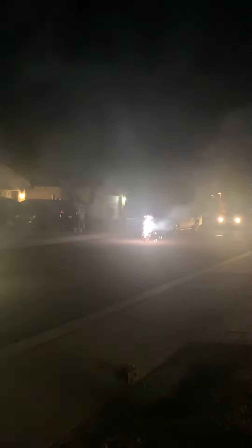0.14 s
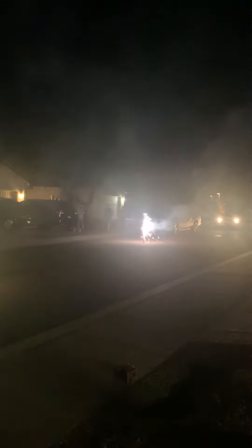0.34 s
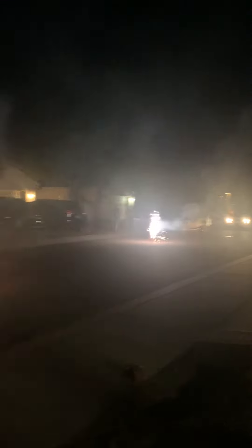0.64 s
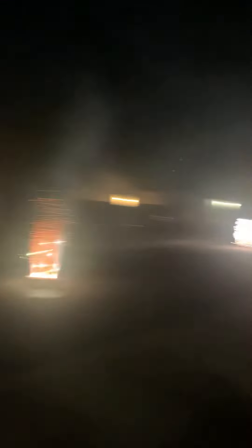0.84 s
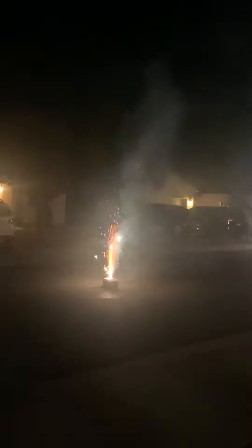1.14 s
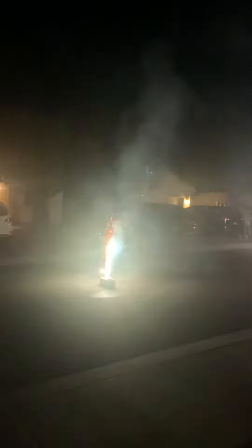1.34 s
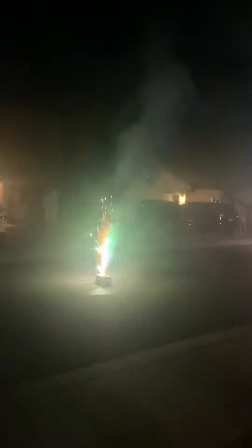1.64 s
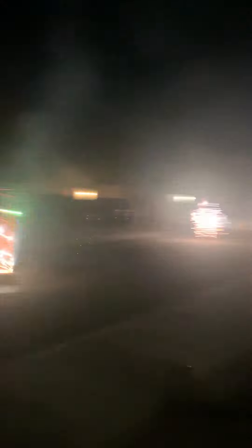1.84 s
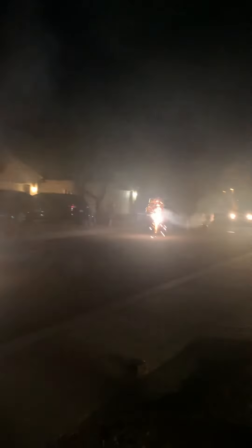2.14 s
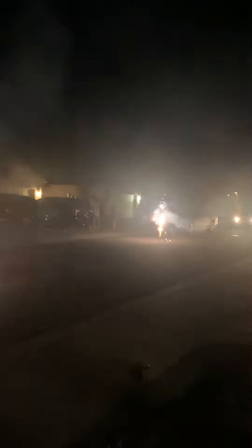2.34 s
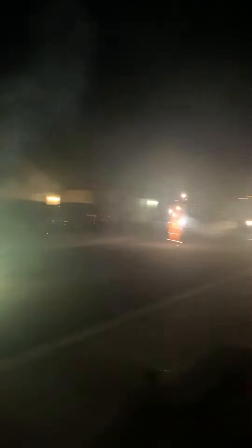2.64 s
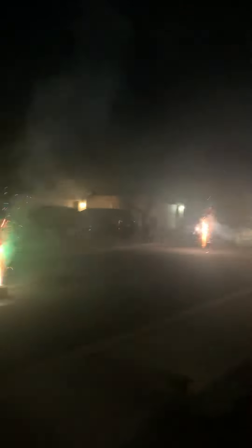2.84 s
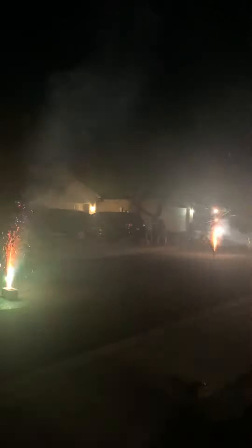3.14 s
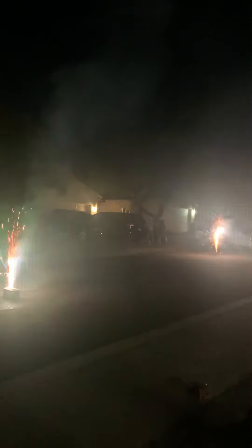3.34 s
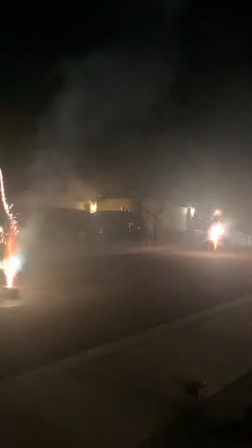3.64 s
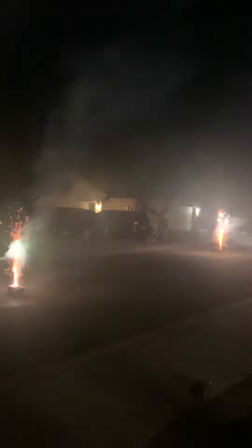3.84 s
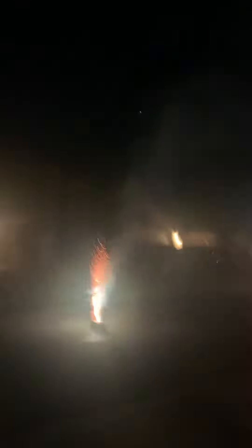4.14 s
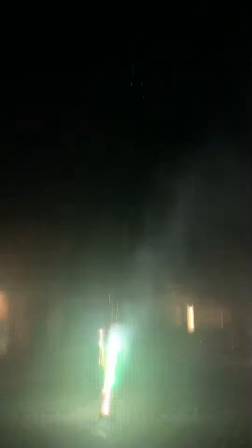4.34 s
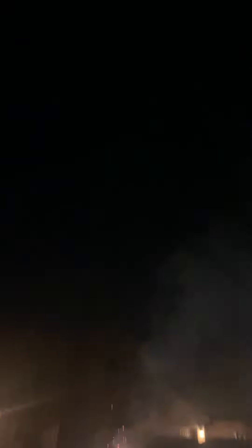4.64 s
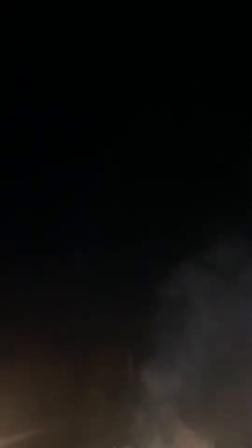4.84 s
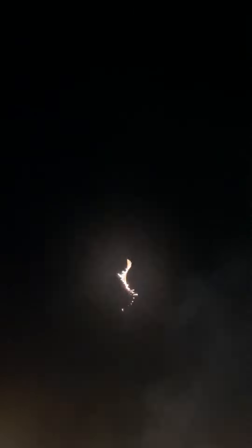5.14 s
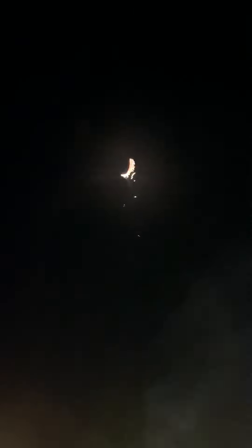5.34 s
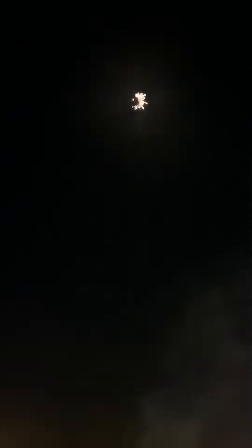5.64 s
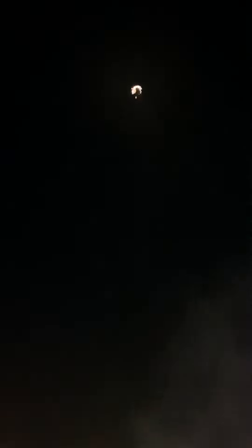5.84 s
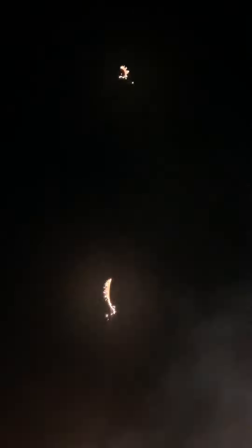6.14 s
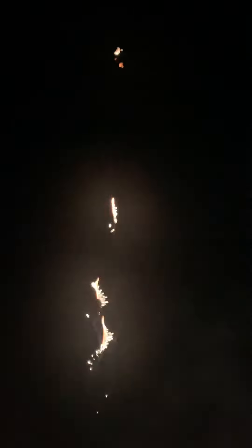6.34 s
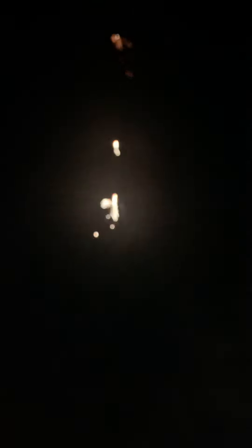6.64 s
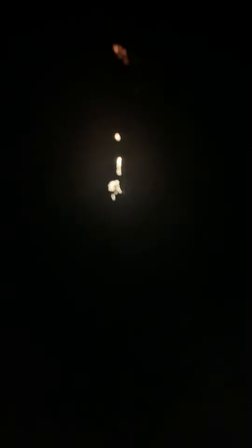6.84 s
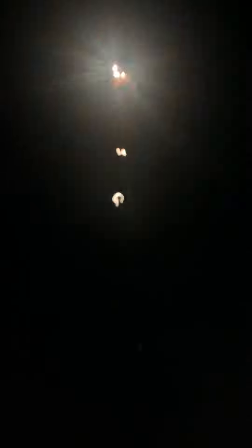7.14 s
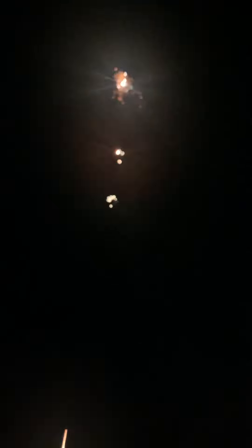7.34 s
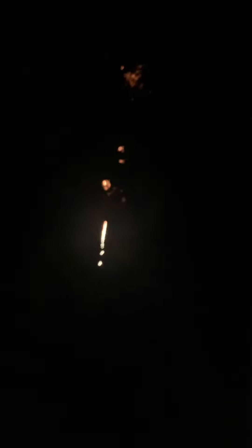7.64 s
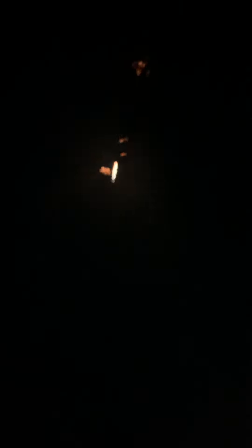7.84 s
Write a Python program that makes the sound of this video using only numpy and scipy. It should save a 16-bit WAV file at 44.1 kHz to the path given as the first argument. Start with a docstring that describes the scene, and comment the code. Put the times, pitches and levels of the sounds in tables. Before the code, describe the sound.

Ground fireworks hiss and crackle densely on a street, then fire six shrill, falling whistles, each launched with a sharp thumping pop.

```python
"""Fireworks on a street at night, heard from the kerb through two microphone ports.
Distant shots thud over the town's rumble and the hiss and roar of fountain jets. From 1.2 s sparks
crackle; from 2.1 s lift charges thump in their tubes. From 3.5 s six of them launch whistles, which
tumble and fall in pitch as their fuel burns. From 4.3 s the ground sounds turn hollower: more 1 kHz,
less 2.5 kHz. Asphalt and house fronts reflect throughout."""
import sys
import numpy as np
from scipy import signal
from scipy.fft import rfft, irfft, next_fast_len
from scipy.io import wavfile
from scipy.ndimage import uniform_filter1d

SR = 44100
rng = np.random.default_rng(int(sys.argv[2]) if len(sys.argv) > 2 else 0)


def output_pcm(signal):
    """Save a mono or channel-first signal as 16-bit PCM at the path in sys.argv[1].

    Samples are clipped to [-1, 1] before scaling.
    """
    pcm = np.clip(np.atleast_2d(signal).T, -1, 1) * 32767
    wavfile.write(sys.argv[1], SR, np.round(pcm).astype(np.int16))


N = 352359
TIME_S = np.arange(N) / SR

# Table levels are relative. loudest sparks, plus the second snap of the lift at 3.542 s (row at 3.556 s): (time
# [s], level [dB], treble [dB])
LOUD_SPARKS = [(1.2481, -17.5, 3), (1.3047, -31, 17), (1.339, -21.5, 4), (1.3499, -14, 1),
               (1.3772, -16.5, 4), (1.4057, -28.5, 4), (1.4329, -32, 6), (1.4585, -33, -9),
               (1.4942, -32, 7), (1.5191, -15.5, 0.5), (1.5755, -28.5, 10), (1.6093, -10.5, 3),
               (1.6245, -52, -7), (1.6661, -26, 7), (1.7062, -12, 4), (1.727, -12.5, 20), (1.734, -11.5, 1),
               (1.7414, -16, 4), (1.7629, -12, 12), (1.7876, -10.5, 0.5), (1.8148, -15, 3),
               (1.8199, -15, -12), (1.8347, -11.5, 1), (1.8529, -9.5, 6), (1.8719, -10.5, -1),
               (1.892, -12, 3), (1.9016, -13, -5), (1.9106, -9.5, 3), (1.9193, -8.5, 3),
               (1.9349, -11.5, -1), (1.9434, -13, 4), (1.9788, -13, 6), (1.9853, -14, 17), (1.9956, -11, 3),
               (2.0033, -13.5, -4), (2.0145, -13.5, -7), (2.0215, -8, 14), (2.0318, -13, -14),
               (2.0433, -10.5, -1), (2.0763, -8.5, 13), (2.0932, -15.5, -11), (2.1093, -10.5, 1),
               (2.1351, -13, -3), (2.1694, -40, 11), (2.1859, -8.5, -1), (2.2003, -11, -1),
               (2.2096, -18, -8), (2.222, -14, 17), (2.2299, -22, 8), (2.2516, -21, -3), (2.2611, -25, -1),
               (2.2695, -9.5, 4), (2.2779, -15, -5), (2.2851, -10, 1), (2.3016, -8, -1), (2.3128, -30, -3),
               (2.3274, -8, -1), (2.3529, -20, 9), (2.3583, -13, 9), (2.3784, -18, 3), (2.3925, -17, 9),
               (2.4367, -13, -11), (2.452, -11, 2), (2.4587, -15, -15), (2.4975, -10.5, 0),
               (2.5084, -10.5, 6), (2.5274, -13, 6), (2.5583, -9.5, 5.5), (2.5766, -13, 5),
               (2.5949, -9, -1), (2.6242, -9, -2), (2.638, -21, -1), (2.6436, -16, 4), (2.655, -14.5, -5),
               (2.6675, -11, 6), (2.6695, -11, -4), (2.673, -7.5, 1), (2.6755, -17, -4), (2.709, -19.5, 7),
               (2.7382, -15.5, -2), (2.7498, -17, 1), (2.7822, -12.5, 3), (2.8055, -25, 14),
               (2.8096, -26, 9), (2.8241, -15.5, -1), (2.84, -24, 15), (2.8572, -14.5, 2),
               (2.864, -14.5, -2), (2.8935, -22, 4), (2.9048, -12.5, 4), (2.9114, -20, 1), (2.938, -21, 5),
               (2.9412, -11, 1), (2.945, -9, -7), (2.9797, -17, 6), (2.991, -16.5, 5), (3.0188, -24, 2),
               (3.0271, -9.5, 4), (3.0482, -15, 4), (3.066, -8.5, 0.5), (3.0928, -15, -1),
               (3.1355, -16.5, 2), (3.146, -19, 4), (3.1576, -19.5, -13), (3.1716, -16, 2),
               (3.1834, -15, 0), (3.1896, -21, 4), (3.196, -31, -5), (3.2124, -19, 3), (3.2167, -19, -5),
               (3.2369, -15, 7), (3.2451, -14, 0), (3.262, -10, -3), (3.2683, -17, -5), (3.2861, -17, 4),
               (3.3057, -16, 4), (3.3436, -13, 0.5), (3.369, -18.5, 2), (3.4021, -15.5, -1),
               (3.4226, -13, 3), (3.4388, -35, -1), (3.4501, -12.5, 0), (3.4539, -19, -5),
               (3.4604, -16, -1), (3.4697, -17, 1), (3.5217, -17, 11), (3.533, -14.5, 1.5),
               (3.556, -12, 14), (3.6248, -19, -1), (3.6495, -21, 6), (3.664, -24, 0), (3.8732, -27, -4),
               (3.9052, -24, 0), (3.9593, -24, 3), (3.9936, -23, 2), (4.0544, -22, 3), (4.1614, -25, 6),
               (4.178, -16.5, 0), (4.2203, -23, -2), (4.2479, -20, 5), (4.2552, -19.5, -1),
               (4.2683, -20, 4), (4.3091, -24, 3), (4.32, -18.5, -5), (4.3557, -15, 2.5), (4.3732, -23, 2),
               (4.4068, -17.5, -4), (4.4535, -20.5, 0), (4.5034, -16.5, -2), (4.5693, -21, 5),
               (4.5785, -22, -4), (4.604, -20.5, 0), (4.6274, -21.5, 1), (4.6875, -20.5, -4),
               (4.7337, -21.5, 10), (4.798, -19.5, 0), (4.8134, -25, 11), (4.8275, -16, -2),
               (4.8398, -21, 10), (4.846, -19, -1), (4.8702, -17, 3), (4.9452, -19.5, 0), (4.9498, -22, -6),
               (4.9549, -26, 1), (4.9804, -23, 6), (5.0313, -24, 4), (5.0562, -21, 5), (5.1921, -35, -8),
               (5.2691, -19, -3), (5.3078, -21, -5), (5.3487, -27.5, 8), (5.388, -29, 11),
               (5.4063, -24, 15), (5.4111, -18.5, 1), (5.4164, -18, 15), (5.4496, -27, 12),
               (5.4609, -18, 0), (5.5105, -21, 4), (5.5436, -21.5, -2), (5.5571, -23, -1), (5.5798, -28, 0),
               (5.585, -21, 0), (5.5905, -23, 11), (5.6464, -24, -11), (5.6526, -35, -13),
               (5.7019, -20.5, 13), (5.716, -23.5, -2), (5.7496, -28, 10), (5.7589, -21.5, 12),
               (5.7862, -20.5, 1), (5.8293, -22, 2), (6.2781, -33, -4), (6.3157, -28.5, -5),
               (7.2591, -32.5, -2), (7.362, -37, 2)]
# shower of small sparks: (time [s], level [dB], treble [dB], rate [1/s])
SPARK_SHOWER = [(1.2, -56, 4, 40), (1.35, -46, 5, 60), (1.69, -45, 5, 60), (1.78, -32, 0, 260),
                (2.2, -28, 0, 290), (2.65, -30, -2, 260), (2.8, -35, 0, 240), (3.2, -33, -1, 240),
                (3.7, -36.5, 1, 170), (4.4, -39.5, -1, 150), (4.85, -39, -2, 150), (5.5, -36, -1, 160),
                (5.8, -37, 0, 150), (6.2, -42, -6, 100), (6.7, -64, -4, 20)]
# spark or snap: (frequency [Hz], level [dB])
CRACK_SPECTRUM = [(40, -30.5), (110, -9), (280, -2.5), (420, -9), (580, -13.5), (850, 4.5), (1150, -3.5),
                  (1350, -0.5), (1560, 5.5), (1800, -2), (2150, -2), (2750, 1.5), (3200, -3.5),
                  (4800, -2.5), (6100, 0.5), (9000, -5.5), (13500, -8.5), (15500, -13.5)]

# one flight per whistle: (time [s], pitch [Hz], level [dB])
WHISTLE_FLIGHTS = [
    [(3.555, 5055, -14.5), (3.579, 4850, -17.0), (3.619, 4775, -21.5), (3.651, 4550, -18.0),
     (3.683, 4550, -16.0), (3.707, 4390, -18.0), (3.755, 4345, -22.5), (3.795, 4165, -21.5),
     (3.875, 4045, -23.0), (3.891, 3990, -28.5), (4.019, 3775, -28.5), (4.043, 3780, -40.0),
     (4.099, 3685, -25.0), (4.203, 3570, -27.5), (4.299, 3515, -42.0), (4.451, 3390, -27.5),
     (4.611, 3290, -33.5), (4.739, 3240, -34.0), (4.811, 3205, -40.0), (4.827, 3175, -35.0),
     (4.979, 3110, -41.5), (5.131, 3215, -39.5), (5.243, 3200, -43.0), (5.275, 3280, -50.0)],
    [(4.889, 5415, -14.0), (4.897, 5405, -13.5), (4.921, 5005, -18.5), (4.969, 5060, -18.0),
     (4.993, 4875, -18.5), (5.025, 4900, -25.0), (5.057, 4670, -15.0), (5.089, 4655, -23.0),
     (5.121, 4520, -20.5), (5.145, 4540, -22.5), (5.177, 4345, -22.5), (5.225, 4350, -17.5),
     (5.241, 4250, -27.0), (5.297, 4205, -20.5), (5.313, 4160, -33.0), (5.361, 4110, -22.0),
     (5.425, 4030, -31.0), (5.505, 3960, -28.0), (5.545, 3915, -32.0), (5.561, 3885, -24.0),
     (5.785, 3690, -37.0), (5.865, 3620, -28.5), (5.969, 3570, -34.0), (6.057, 3485, -29.0),
     (6.305, 3425, -41.0), (6.353, 3465, -37.0), (6.449, 3600, -47.5), (6.465, 3745, -40.0)],
    [(5.86, 5045, -14.0), (5.884, 4935, -20.0), (5.916, 5105, -19.0), (5.932, 4845, -16.0),
     (5.996, 4610, -23.0), (6.108, 4305, -23.5), (6.156, 4285, -25.0), (6.348, 3905, -29.0),
     (6.404, 3860, -42.0), (6.452, 3785, -36.5), (6.556, 3645, -39.5), (6.604, 3590, -33.0),
     (6.716, 3465, -30.5), (6.908, 3330, -43.5), (7.148, 3175, -43.0), (7.164, 3185, -57.5),
     (7.22, 3120, -42.5), (7.388, 3075, -46.0), (7.548, 3250, -53.0)],
    [(6.022, 4995, -16.0), (6.062, 4870, -20.5), (6.094, 4980, -19.5), (6.134, 4640, -22.5),
     (6.446, 4025, -27.0), (6.478, 4065, -39.0), (6.51, 3990, -28.0), (6.694, 3840, -33.0),
     (6.718, 3815, -38.0), (6.862, 3605, -28.5), (7.222, 3295, -45.0), (7.246, 3370, -34.0),
     (7.254, 3270, -46.0), (7.326, 3230, -44.0), (7.406, 3260, -52.0), (7.414, 3365, -43.5)],
    [(6.078, 5545, -24.5), (6.15, 5125, -21.0), (6.174, 5145, -26.0), (6.182, 5020, -23.5),
     (6.246, 4840, -21.0), (6.278, 4810, -26.5), (6.406, 4330, -28.5), (6.454, 4285, -28.5),
     (6.542, 4035, -27.5), (6.726, 3825, -35.5), (6.862, 3670, -30.0), (7.15, 3510, -30.0),
     (7.166, 3485, -39.5), (7.246, 3435, -31.5), (7.326, 3415, -38.0), (7.542, 3495, -38.5),
     (7.598, 3600, -46.0)],
    [(7.136, 4945, -24.5), (7.152, 4925, -21.0), (7.176, 4835, -21.0), (7.184, 4715, -21.5),
     (7.2, 4630, -20.5), (7.224, 4625, -22.5), (7.264, 4455, -21.0), (7.344, 4235, -21.0),
     (7.408, 4110, -29.0), (7.416, 4055, -30.5), (7.504, 3900, -27.0), (7.52, 3885, -37.0),
     (7.568, 3815, -27.5), (7.688, 3665, -26.5), (7.704, 3675, -37.5), (7.752, 3605, -30.0),
     (8.0, 3420, -37.0)],
]
# one voice per whistle: (trim [dB], screech [0-1], overtones [dB], overtone fade [dB/s],
# tumble rate [Hz], tumble depth [factor])
WHISTLE_VOICES = [(1.5, 0.46, 3.5, 11.5, 17, 0.35), (0.5, 0.4, 0.5, 2, 12, 1.8), (0, 0.8, 0.5, 9, 12, .6),
                  (-0.5, .9, 2, 8.5, 12, 1.2), (-0.5, 0.76, -1.5, 2.5, 12, 0.6),
                  (1, 0.26, 1.5, 16.5, 8.6, 0.1)]
# whistle tube: (harmonic [number], level [dB], tumble swing [dB], launch offset [dB])
WHISTLE_PARTIALS = [(1, 0.5, 1, 1.5), (2, -8, 1.5, -14), (3, -15, 9, -12.5), (4, -24.5, 9, -9)]
# whistle gas: (frequency [Hz], level [dB])
EXHAUST_SPECTRUM = [(400, -28), (900, -17), (1500, 3.5), (3000, 3.5), (5000, -2.5), (7000, 9.5),
                    (11000, -12), (15500, -1)]

# lift charges: (time [s], push [dB], push length [s], puff start pitch [Hz], puff [dB], puff lag [s],
# snap [dB], snap treble [dB])
LIFT_CHARGES = [(2.135, -7, 0.0043, 464, -10.5, 0.0026, -14.5, 5),
                (3.542, -22.5, 0.001, 490, -14.5, 0.0036, -12.5, 3),
                (4.878, -22.5, 0.0012, 492, -13, 0.0021, -16.5, -4),
                (5.848, -22, .0014, 468.5, -11.5, .0014, -13.5, 2.5),
                (6.011, -21, 0.0019, 493, -14, 0.0015, -20.5, 0),
                (6.065, -26, 0.001, 503, -15.5, 0.00437, -22, -9),
                (7.126, -28, 0.0009, 524, -16, 0.0022, -27.5, -4),
                (7.656, -36, 0.0017, 527, -31.5, 0.004, -24.5, 14)]
# shots some streets away: (time [s], push [dB], push length [s])
DISTANT_SHOTS = [(.285, -30, 0.003), (.305, -34, 0.0025), (.357, -27.5, 0.0022)]
# gas push: (frequency [Hz], level [dB])
THUMP_SPECTRUM = [(20, -24), (45, -19), (70, 0.5), (130, 5.5), (260, -1.5), (410, 6.5), (540, -5), (800, 3),
                  (1500, 1), (4000, -40), (12000, -58)]
# turbulent gas behind a shot: (frequency [Hz], level [dB])
RUSH_SPECTRUM = [(60, -26), (200, -11), (330, -0.5), (450, 1.5), (560, -13), (750, -11.5), (3000, -24),
                 (12000, -76)]

# jet hiss: (time [s], level [dB])
JET_ENVELOPE = [(0, -54), (.7, -52), (1.0, -51.5), (1.7, -50.5), (3.5, -56.5), (6.0, -50.5), (6.6, -62.5),
                (7.4, -63), (8, -68)]
# jet hiss: (frequency [Hz], level [dB])
JET_SPECTRUM = [(600, 4), (1000, -0.5), (1550, -8), (2200, -13), (3100, 4.5), (4500, 0.5), (5400, -7.5),
                (7200, -0.5), (8100, -6), (9500, -10.5), (15500, -9)]
# flame roar: (time [s], level [dB])
ROAR_ENVELOPE = [(0, -55.5), (.7, -55), (1.2, -54), (2.2, -46), (3.3, -51.5), (4.2, -62), (6, -52),
                 (6.7, -68), (8, -64.5)]
# flame roar: (frequency [Hz], level [dB])
ROAR_SPECTRUM = [(25, -36), (70, -0.5), (115, -2), (170, -5.5), (260, -1), (400, -12.5), (600, -26.5),
                 (1500, -15.5), (5000, -48)]
# town rumble: (frequency [Hz], level [dB])
TOWN_SPECTRUM = [(20, -27), (45, -7), (70, 9.5), (110, -9), (250, -15), (400, 0.5), (600, -34),
                 (1200, -12.5), (3000, -3), (9000, -64)]

# house fronts and parked cars: (delay [s], level [dB])
STREET_ECHOES = [(0.014, -16), (0.027, -38), (.072, -13.5), (0.097, -21), (.135, -66)]
# street tail: (frequency [Hz], T60 [s])
TAIL_DECAY = [(100, 0.1), (400, 0.69), (1500, 0.29), (4000, 0.35), (8000, 0.056), (15000, 0.12)]
# tail between the ports: (frequency [Hz], coherence [0-1])
TAIL_COHERENCE = [(100, 1), (400, 0.96), (1000, 0), (2800, 0), (5000, 1), (15000, 1)]
# hollow colour of the ground sounds: (frequency [Hz], gain [dB])
HOLLOW_RESPONSE = [(500, 1), (750, 2), (1100, 5), (1550, -4), (2000, 1.5), (2550, -13.5), (3400, 3.5),
                   (6000, -1), (9500, -0.5), (12000, 1), (15000, 0)]
# right port: (frequency [Hz], phase [half turns])
PORT_PHASE = [(30, 0), (120, .1), (280, .35), (600, .8), (1500, .85), (3000, 1.05), (4700, 1.23),
              (15000, 1.23)]


def cracks(rows, bounce=0.66, bounce_s=0.0007, fizz_db=-1, fizz_s=0.00087,
           scatter_db=-4, scatter_s=0.0019, split_hz=4000, size=640):
    """Each crack is a shock with a brief fizz, a bounce off the asphalt and scatter at each port."""
    t, out = np.arange(size) / SR, np.zeros((2, N))
    low_pass, bass = signal.butter(1, split_hz, fs=SR), signal.butter(1, 900, fs=SR)
    for time_s, db, treble_db in rows:
        fizz = rng.standard_normal(size) * t * np.exp(-t / (fizz_s * rng.uniform(0.63, 1.8)))
        scatter = rng.standard_normal((2, size)) * np.exp(-t / scatter_s)
        scatter[1] += signal.lfilter(*bass, scatter[0] - scatter[1])  # bass reaches both ports alike
        shock = gain(scatter_db) * scatter / np.linalg.norm(scatter[0])
        shock += gain(fizz_db) * fizz / np.linalg.norm(fizz)
        shock[:, 0] += 1
        shock[:, round(bounce_s * rng.uniform(0.7, 1.2) * SR)] += bounce  # higher sparks bounce later
        body, treble = signal.lfilter(*low_pass, shock), gain(treble_db)
        shock = (body + treble * (shock - body)) / np.sqrt(0.5 + 0.5 * treble ** 2)
        add(out, time_s, gain(db) * shock)
    return coloured(out, CRACK_SPECTRUM) * np.sqrt(0.003 * SR / 2)


def crackle(spread_db=3.4, treble_spread_db=3, max_per_s=300):
    """Small sparks burst at random, a few much louder than the rest."""
    times_s, levels_db, trebles_db, rates_per_s = np.transpose(SPARK_SHOWER)
    when, strength, tint, luck = rng.random((round(max_per_s * N / SR), 4)).T
    onset_s = when * N / SR
    db = np.interp(onset_s, times_s, levels_db) + spread_db * (np.minimum(-np.log(strength), 3) - 1)
    treble_db = np.interp(onset_s, times_s, trebles_db) + treble_spread_db * (2 * tint - 1)
    unlit = luck * max_per_s > np.interp(onset_s, times_s, rates_per_s, left=0, right=0)
    db[unlit] = -np.inf
    return cracks(zip(onset_s, db, treble_db))


def whistle(flight, voice, wobble=0.0098, jitter=0.0057, calm_s=0.19, rasp=0.29, overtone_rasp=0.077,
            screech_hz=416, screech_s=0.39, sputter_db=2.2, sputter_hz=45,
            attack_s=0.0017, release_s=0.017):
    """Burning fuel lengthens the tube's air column, so pitch falls; tumbling swings pitch and beam."""
    trim_db, screech, overtones_db, fade_db_per_s, tumble_hz, depth = voice
    times_s, pitches_hz, levels_db = np.transpose(flight)
    t = np.arange(times_s[0], times_s[-1], 1 / SR)
    age_s, n = t - t[0], len(t)
    tumble_rad = phase_rad(tumble_hz * (1 + 0.015 * drift(7.3, n)))
    facing = np.log(0.12 + abs(np.cos(tumble_rad / 2))) + 0.35
    flare = np.exp(-age_s / calm_s)  # the burn is wildest at launch
    unrest = 0.14 + flare
    bend = unrest * (wobble * np.sin(tumble_rad) + jitter * drift(185, n))
    pitch_hz = np.interp(t, times_s, pitches_hz) * (1 + bend)
    phase = phase_rad(pitch_hz)
    smear = 0.54 * screech * np.exp(-age_s / screech_s)  # the fresh flame is unsteady
    upper_db = overtones_db - fade_db_per_s * age_s + sputter_db * drift(sputter_hz, n)
    tone = 0
    for k, db, swing_db, launch_db in WHISTLE_PARTIALS:
        beam = gain(db + depth * swing_db * facing + launch_db * flare + upper_db * (k > 1))
        turbulence = 1 + rasp * unrest * eddies(140, n)
        turbulence += (smear * k + overtone_rasp * (k - 1)) * eddies(screech_hz, n)
        tone += (k * pitch_hz < SR / 2) * beam * (turbulence * np.exp(1j * k * phase)).real
    gate = np.clip(np.minimum(age_s / attack_s, (t[-1] - t) / release_s), 0, 1)
    return t[0], np.sqrt(2) * gain(np.interp(t, times_s, levels_db) + trim_db) * gate * tone


def exhaust(whistles, relative_db=-25):
    """The gas that blows the whistles hisses in step with their level."""
    whistle_rms = np.sqrt(abs(uniform_filter1d(whistles ** 2, 900)))
    return gain(relative_db) * whistle_rms * noise(EXHAUST_SPECTRUM)


def thumps(rows, lag_s=0.008, size=1024):
    """Gas swells out of a tube: a low pulse, deeper for a longer push."""
    t, pushes = np.arange(size) / SR, np.zeros(N)
    for time_s, db, push_s, *_ in rows:
        push = (1 - t / push_s / 2) * np.exp(-t / push_s / 2)
        add(pushes, time_s + lag_s, gain(db) * push / (push_s * SR))
    return coloured(pushes, THUMP_SPECTRUM) * np.sqrt(0.01 * SR)


def muzzles(rise_s=0.0024, drop=0.81, drop_s=0.0051, rush_db=-13, rush_s=0.015, size=3072):
    """A launch tube's gas swings in a puff that deepens as it spreads; turbulent gas rushes after."""
    t, puffs, rush = np.arange(size) / SR, np.zeros((1, N)), np.zeros(N)
    envelope = (t / rise_s) ** 2 * np.exp(2 - 2 * t / rise_s)
    glide = 1 - drop * (1 - np.exp(-t / drop_s))
    for time_s, _, _, hz, db, lag_s, *_ in LIFT_CHARGES:
        add(puffs, time_s + lag_s, -gain(db) * envelope * np.sin(phase_rad(hz * glide)))
        add(rush, time_s, gain(db + rush_db) * np.exp(-t / rush_s) * rng.standard_normal(size))
    return puffs + coloured(rush, RUSH_SPECTRUM)


def jet(flutter_db=0.8, flutter_hz=45):
    """Gas hisses through cardboard nozzles, fluttering as the powder burns unevenly."""
    hiss = noise([(150, -0.99)] + JET_SPECTRUM)
    return hiss * gain_curve(JET_ENVELOPE) * gain(flutter_db * drift(flutter_hz))


def roar(flutter_db=2, flutter_hz=18):
    """Flames buffet the air above the nozzles."""
    return noise(ROAR_SPECTRUM) * gain_curve(ROAR_ENVELOPE) * gain(flutter_db * drift(flutter_hz))


def town(rumble_db=-61, swell_db=1.0, hum_hz=74, hum_db=-73, waver_db=2):
    """Low rumble of the neighbourhood with a faint, wavering hum."""
    hum = np.sqrt(2) * gain(hum_db + waver_db * drift(2.2)) * np.sin(2 * np.pi * hum_hz * TIME_S)
    return gain(rumble_db + swell_db * drift(27.0)) * noise(TOWN_SPECTRUM) + hum


def street(x, tail_db, echo_db):
    """Direct sound, slaps from house fronts and cars, and a scattered tail at each port."""
    count, taps = SR // 20, np.zeros((2, SR))
    positions = np.arange(count) * 20 + rng.integers(0, 20, (2, count))
    np.put_along_axis(taps, positions, rng.choice([-1., 1.], (2, count)), 1)
    hz, t, spectra = signal.stft(taps, SR, nperseg=256)
    coherence = np.clip(at_hz(TAIL_COHERENCE, hz), 0, 1)[:, None]
    spectra[1] = coherence * spectra[0] + np.sqrt(1 - coherence ** 2) * spectra[1]
    decay = gain(-60 * t / at_hz(TAIL_DECAY, hz)[:, None])
    tail = signal.istft(spectra * decay, SR, nperseg=256)[1]
    paths = gain(tail_db) * tail / np.linalg.norm(tail[0])
    paths[:, 0] += 1
    for delay_s, db in STREET_ECHOES:
        paths[:, round(delay_s * SR)] += gain(db + echo_db)
    return signal.oaconvolve(x, paths, axes=1)[:, :N]


def hollow_colour(ground, start_s=4.33):
    """At start_s the ground sounds turn hollower: more 1 kHz, less 2.5 kHz."""
    response = gain(at_hz(HOLLOW_RESPONSE, np.fft.rfftfreq(2 * N, 1 / SR)))
    hollow = irfft(rfft(ground, 2 * N) * response)[:, :N]
    return np.where(TIME_S > start_s, hollow, ground)


def gain(db):
    """Decibels to an amplitude factor."""
    return 10 ** (np.asarray(db) / 20)


def gain_curve(rows):
    """(time [s], level [dB]) to a gain per sample."""
    return gain(np.interp(TIME_S, *np.transpose(rows)))


def at_hz(rows, hz):
    """Table lookup on a log-frequency axis."""
    knots_hz, values = np.transpose(rows)
    return np.interp(np.log(hz + 1), np.log(knots_hz + 1), values)


def phase_rad(hz):
    """Running phase of a varying frequency."""
    return 2 * np.pi * np.cumsum(hz) / SR


def add(mix, time_s, sound):
    """Mixes a sound in at time_s."""
    part = mix[..., max(round(time_s * SR), 0):][..., :sound.shape[-1]]
    part += sound[..., :part.shape[-1]]


def drift(rate_hz, n=N, hop=32):
    """Slow noise, rms about 1, rolled off above rate_hz."""
    size = 2 * N // hop
    hz = np.fft.rfftfreq(size, hop / SR)
    slow = irfft(rfft(rng.standard_normal(size)) / (1 + (hz / rate_hz) ** 4))
    curve = np.interp(np.arange(N) / hop, np.arange(len(slow)), slow)
    return curve[:n] / np.sqrt(np.mean(curve ** 2))


def eddies(rate_hz, n):
    """Complex drift: shakes a tone's amplitude and phase."""
    return (drift(rate_hz, n) + 1j * drift(rate_hz, n)) / np.sqrt(2)


def coloured(x, spectrum, size=4096):
    """Minimum-phase filter of unit energy with the given spectrum."""
    log_gain = np.log(gain(at_hz(spectrum, abs(np.fft.fftfreq(size, 1 / SR)))))
    ring = np.fft.ifft(np.exp(np.conj(signal.hilbert(log_gain)))).real[:size // 2]
    return signal.oaconvolve(np.atleast_2d(x), ring[None] / np.linalg.norm(ring), axes=1)[:, :N]


def noise(spectrum):
    """Coloured noise, rms about 1."""
    return coloured(rng.standard_normal(N), spectrum)


def scene():
    """All sources, each with its own share of the street."""
    whistles = np.zeros((1, N))
    for flight, voice in zip(WHISTLE_FLIGHTS, WHISTLE_VOICES):
        add(whistles, *whistle(flight, voice))
    lift_snaps = [(time_s, db, treble_db) for time_s, *_, db, treble_db in LIFT_CHARGES]
    sparks = gain(-4.5) * cracks(LOUD_SPARKS) + gain(-3.0) * cracks(lift_snaps) + crackle()
    ground = street(sparks, tail_db=-10.0, echo_db=-28)
    ground += street(jet() + roar() + town(), tail_db=-12.5, echo_db=-1)
    launches = street(thumps(LIFT_CHARGES) + muzzles(), tail_db=-14, echo_db=-2.5)
    distant = street(thumps(DISTANT_SHOTS), tail_db=0.5, echo_db=-10)
    airborne = street(whistles + exhaust(whistles), tail_db=-6.5, echo_db=-6.0)
    return hollow_colour(ground) + launches + distant + gain(-2.2) * airborne


def record(dry, port_delay_s=0.000235, bass_left_db=1.6, bass_hz=450, ceiling=0.85, cutoff_hz=15950):
    """The right port lags and turns in phase above the bass; peaks are rounded, then band-limited."""
    size = next_fast_len(N + 4096)
    hz = np.fft.rfftfreq(size, 1 / SR)
    spectra = rfft(dry, size)
    spectra[1] *= np.exp(1j * np.pi * (at_hz(PORT_PHASE, hz) - 2 * hz * port_delay_s))
    spectra *= gain(np.outer([1, -1], bass_left_db * np.exp(-(hz / bass_hz) ** 4)))
    ports = irfft(spectra, size)[:, :N]
    rounded = ports / (1 + (ports / ceiling) ** 4) ** 0.25
    low_pass = signal.firwin(255, cutoff_hz, window=("kaiser", 8), fs=SR)
    return signal.oaconvolve(rounded, low_pass[None], "same")


dry = scene()
out = record(dry)
output_pcm(out)
```